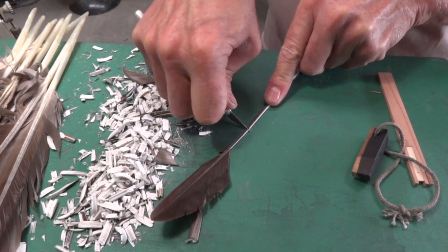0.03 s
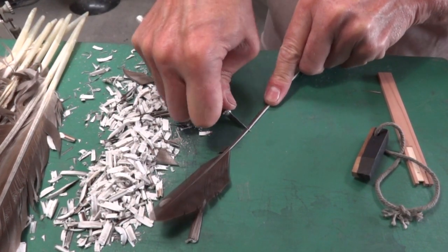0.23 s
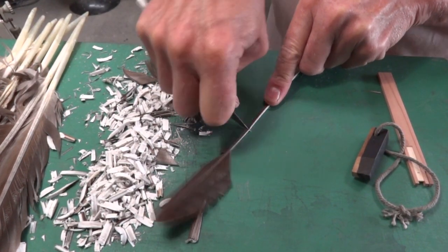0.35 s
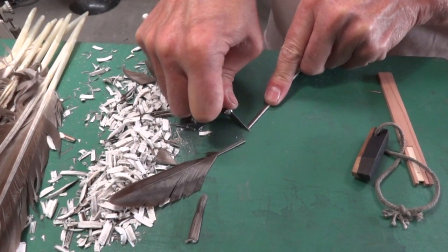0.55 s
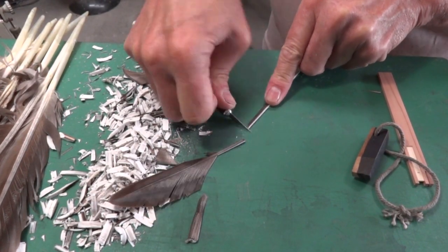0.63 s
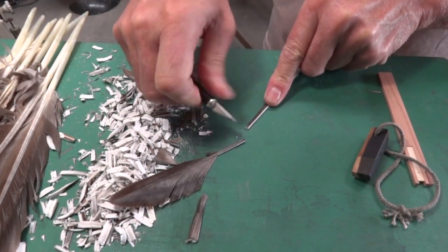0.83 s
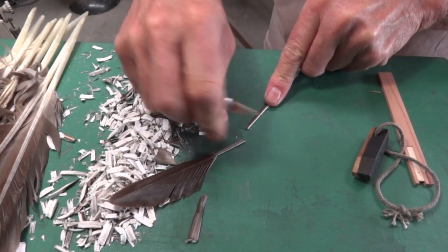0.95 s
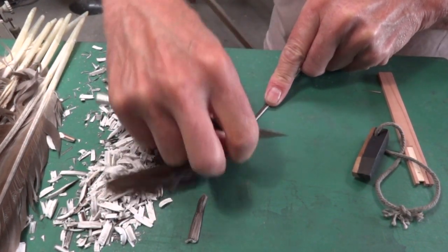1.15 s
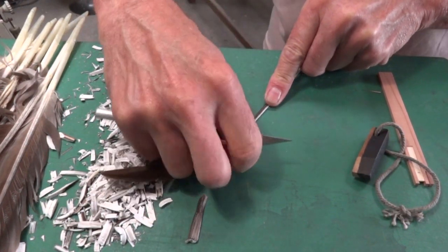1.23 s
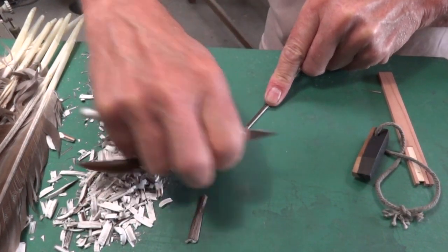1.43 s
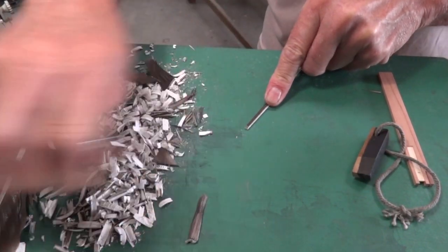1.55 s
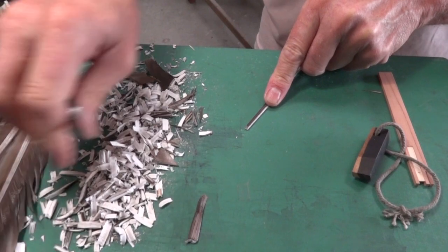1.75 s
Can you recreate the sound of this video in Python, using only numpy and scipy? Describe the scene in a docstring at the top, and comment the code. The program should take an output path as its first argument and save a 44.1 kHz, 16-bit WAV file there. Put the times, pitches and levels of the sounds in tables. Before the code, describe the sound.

A feather quill cracks and snaps under a small blade, followed by faint rustling.

```python
"""On a cutting mat in a quiet room, a small blade is pressed through a feather quill, close by.
The shaft cracks, splits in a quick run of ticks and snaps off; a clack follows as the blade comes free.
Each break makes the quill ring briefly and tears a few fibres, heard as a burst of noise.
Then a hand brushes the feather aside among dry shavings, over a low hum."""
import sys
import numpy as np
from scipy import signal
from scipy.fft import rfft, irfft, next_fast_len
from scipy.io import wavfile
from scipy.ndimage import map_coordinates

SR = 44100
rng = np.random.default_rng(int(sys.argv[2]) if len(sys.argv) > 2 else 0)


def generate_wav(signal):
    """Clip the signal to [-1, 1] and save it as 16-bit WAV at the path in sys.argv[1]."""
    frames = np.transpose(np.atleast_2d(signal))
    scaled = np.clip(frames, -1, 1) * 32767
    pcm = np.round(scaled).astype(np.int16)
    wavfile.write(sys.argv[1], SR, pcm)


N = 79380
TIME = np.arange(N) / SR

# The first cracks. Each row: start in seconds, level in dB.
CRACK_TIMES = [(.2249, -25), (.22529, -24.5), (.2266, -28.5)]
# The shaft's tones. Each row: pitch in Hz, level in dB, seconds to fade by 60 dB (called t60).
SHAFT_TONES = [(330, -16, 0.013), (509, -20.5, 0.013), (1370, -9.5, 0.017), (2510, -13.5, 0.012),
               (3070, -7.5, 0.0079), (4400, -27, .005), (5080, -3.5, 0.012), (10280, -15, .005),
               (12570, 2.5, 0.0046), (13500, -18, .003)]
def crack():
    """The shaft gives way under the blade and rings."""
    return breaks(CRACK_TIMES, SHAFT_TONES, tear_db=-6, tear_t60=0.023, low_cut_hz=150)

# The steps of the split. Each row: start in seconds, level in dB.
SPLIT_TIMES = [(.3396, -25), (.3536, -35), (.3642, -22.5), (.3722, -30.5), (.3753, -28.5)]
# The wall's tones. Each row: pitch in Hz, level in dB, fade time in seconds.
WALL_TONES = [(1400, -16, 0.0063), (2360, -10.5, .009), (4860, -5.5, 0.0084), (5300, -11.5, 0.008),
              (6850, -7.5, 0.00412), (8900, -7.5, .006), (9920, -6.5, 0.0057), (12850, -7, 0.0048)]
def split():
    """A split runs across the quill's wall in quick ticks."""
    return breaks(SPLIT_TIMES, WALL_TONES, tear_db=-11.5, tear_t60=0.0163, low_cut_hz=5000)

# The snap. Each row: start in seconds, level in dB.
SNAP_TIMES = [(.3769, -11)]
# The freed tube's tones. Each row: pitch in Hz, level in dB, fade time in seconds.
TUBE_TONES = [(1300, -60, .008), (3626, -23.5, 0.011), (6420, -16, 0.0051), (7760, 1, 0.0053),
              (9740, -28, 0.0045), (11700, -18, .004), (13240, -15.5, 0.0055)]
def snap():
    """The end snaps off and the freed tube rings."""
    return breaks(SNAP_TIMES, TUBE_TONES, tear_db=-13, tear_t60=0.0099, low_cut_hz=6000)

# The knocks of the clack. Each row: start in seconds, level in dB.
CLACK_TIMES = [(.6552, -31), (.656, -19), (.6573, -38)]
# Tones of blade and quill. Each row: pitch in Hz, level in dB, fade time in seconds.
BLADE_TONES = [(392, -28, 0.026), (1080, -24, 0.0065), (3130, -10.5, 0.012), (3320, -16, 0.013),
               (4440, -12, .007), (5740, -3.5, 0.0085), (6500, -12, 0.0087), (8580, -9, 0.006),
               (10630, -10.5, 0.0059), (12650, -1, .006), (13750, -31, .004)]
def clack():
    """The blade comes free and rings with the quill."""
    return breaks(CLACK_TIMES, BLADE_TONES, tear_db=-9.5, tear_t60=0.026, low_cut_hz=1210)

# The colour of tearing fibres. Each row: frequency in Hz, level in dB.
TEAR_COLOUR = [(200, -28), (700, -13), (1500, -1), (3400, 0.5), (6000, 0), (9000, -8.5), (13500, 4),
               (15000, -16), (16500, -23)]
def breaks(events, tones, tear_db, tear_t60, low_cut_hz):
    """Each sudden release rings the tones and gives a short burst of tearing fibres."""
    out, t = np.zeros(N), TIME[:SR // 10]
    for start, db in events:
        tear = filtered(noise(TEAR_COLOUR, len(t)), lambda f: f / np.hypot(f, low_cut_hz))
        tear *= amp(tear_db - 60 * t / tear_t60)
        add(out, start, amp(db) * (ring(tones, t, pitch_spread=0.015) + tear))
    return out

def ring(tones, t, pitch_spread):
    """Fading tones start together, a little different in level and pitch each time."""
    hz, db, t60 = np.transpose(tones)[:, :, None]
    db_shift, pitch_shift = rng.standard_normal((2, len(tones), 1))
    fade = amp(db + db_shift - 60 * t / t60)
    waves = np.cos(2 * np.pi * hz * (1 + pitch_spread * pitch_shift) * t)
    return np.heaviside(t, .5) * (fade * waves).sum(0)

# The cut end's tones on the mat. Each row: pitch in Hz, level in dB, fade time in seconds.
SKID_TONES = [(1670, -7, 0.0069), (2820, -1.5, 0.0065), (3180, -7.5, 0.0056), (4640, -1, 0.0038),
              (5780, 5, 0.011), (9200, 4, .002), (12400, -2, 0.0022)]
def skid(peak_s=.6853, half_s=0.0026, db=-37.5):
    """The cut end slides briefly on the mat, and the rubbing makes it ring."""
    ringing = ring(SKID_TONES, TIME[:SR // 20], pitch_spread=0.0071)
    rub = signal.fftconvolve(rng.standard_normal(N), ringing)[:N]
    return unit(rub) * amp(db) * swell(peak_s, half_s)

# Small ticks. Each row: start in seconds, level in dB, pitch in Hz, width in octaves.
DRY_TICKS = [(.0695, -45.5, 11300, 0.21), (0.0697, -53, 3460, 0.54), (0.5774, -48, 4900, 0.36),
             (1.2304, -48, 4900, 0.46), (1.458, -56.5, 10970, 0.64), (1.483, -55, 9600, 0.6),
             (1.6242, -46.5, 3500, 0.65), (1.6243, -54.5, 12000, 0.28)]
def ticks(t60=0.011):
    """Tiny touches of blade and shavings, each a quickly fading noise."""
    out, t = np.zeros(N), TIME[:SR // 20]
    for start, db, hz, octaves in DRY_TICKS:
        hiss = band(rng.standard_normal(len(t)), hz, octaves)
        add(out, start, hiss * amp(db - 60 * t / t60))
    return out

# Brushing strokes. Each row: peak time and half length in seconds, level in dB, pitch in Hz,
# width in octaves.
BRUSH_STROKES = [(0.094, 0.052, -73.5, 3960, 0.32), (0.41, 0.024, -63, 14400, .15),
                 (0.83, 0.064, -67, 9100, 1.5), (1.027, 0.012, -63, 2820, 0.45),
                 (1.07, 0.012, -56.5, 3170, 0.63), (1.132, 0.0057, -60, 8400, 1.6),
                 (1.155, 0.0098, -56.5, 5760, 0.67), (1.222, 0.11, -66.5, 5990, 1.7),
                 (1.353, 0.024, -63.5, 6000, 1.02), (1.493, 0.043, -74.5, 6000, 1.4),
                 (1.627, 0.045, -67, 1610, 0.53)]
def brushing(roughness=0.39, grain_s=0.00085):
    """The feather's barbs and the shavings rub in swells of fine, uneven grains."""
    out = np.zeros(N)
    for peak_s, half_s, db, hz, octaves in BRUSH_STROKES:
        flicker = map_coordinates(rng.standard_normal(N), [TIME / grain_s], order=1, mode="wrap")
        grains = rng.standard_normal(N) * np.exp(roughness * flicker)
        out += band(grains, hz, octaves) * amp(db) * swell(peak_s, half_s)
    return out

# The hand's loudness. Each row: time in seconds, level in dB.
HAND_LEVELS = [(0, -65), (.85, -66), (1.1, -61), (1.3, -67.5), (1.48, -69), (1.62, -70.5), (1.8, -63.5)]
# Its colour. Each row: frequency in Hz, level in dB.
HAND_COLOUR = [(30, 1), (80, -6.5), (250, -0.5), (800, -3.5), (2000, -11), (8000, -35)]
def hand():
    """A hand slides over the mat with a soft, low rub."""
    return loudness(HAND_LEVELS) * stereo_noise(HAND_COLOUR)

# Close echoes. Each row: delay in seconds, level in dB before echo_db is added.
NEAR_ECHOES = [(.00378, -13), (.0093, -15.5)]
def echoed(x, echo_db):
    """A sound plus its bounces off hard surfaces close by."""
    return filtered(x, lambda f: 1 + sum(
        amp(db + echo_db) * np.exp(-2j * np.pi * f * delay) for delay, db in NEAR_ECHOES))

# How long the room rings. Each row: frequency in Hz, fade time in seconds.
ROOM_FADE = [(300, 1.5), (3000, 0.62), (8000, 0.56), (14000, .5)]
# The colour of its reflections. Each row: frequency in Hz, level in dB.
ROOM_TONE = [(200, 9), (1500, -2.5), (2300, -2.5), (4000, -3.5), (6500, -6.5), (8000, -6), (9500, -3),
             (12500, -2.5), (16000, -4.5)]
# Their stereo width. Each row: frequency in Hz, width (0 is dead centre).
ROOM_SPREAD = [(1200, 0.28), (4000, 0.31), (12000, 0.21)]
def room(x, tail_db=-12.5, table_db=-11, table_t60=0.12, delay_s=.0035):
    """Quick reflections from the work table, and the room's soft tail."""
    hz, t, spectrum = signal.stft(noise(ROOM_TONE, (2, SR)), SR, nperseg=256)
    fade = amp(-60 * t / along(ROOM_FADE, hz)[:, None])
    tail = signal.istft(spectrum * fade, SR, nperseg=256)[1]
    table = noise(ROOM_TONE, tail.shape) * amp(-60 * TIME[:tail.shape[1]] / table_t60)
    reflections = amp(tail_db) * tail / np.linalg.norm(tail[0])
    reflections += amp(table_db) * table / np.linalg.norm(table[0])
    delayed = np.pad(x, (round(delay_s * SR), 0))
    mid, side = signal.fftconvolve(delayed[None], reflections, axes=1)[:, :N]
    side = filtered(side, lambda f: along(ROOM_SPREAD, f))
    return np.array([mid + side, mid - side])

# The hum's loudness. Each row: time in seconds, level in dB.
HUM_LEVELS = [(0, -74.5), (.35, -67.5), (.46, -62.5), (.65, -87), (.8, -74), (1.13, -55.5), (1.3, -77),
              (1.47, -79), (1.56, -64.5), (1.8, -63)]
def hum(hz=71.8, sharpness=7, octave_db=-10):
    """A low, wavering hum with a quieter tone an octave up."""
    low = resonant(rng.standard_normal(N), hz, sharpness)
    octave = resonant(rng.standard_normal(N), 2 * hz, 2 * sharpness)
    return loudness(HUM_LEVELS) * (low + amp(octave_db) * octave)

# The colour of the room's air. Each row: frequency in Hz, level in dB.
AIR_COLOUR = [(12, -37), (20, -7), (59, 0), (207, -4), (534, -15), (705, -13), (1540, -21), (1720, -20),
              (3260, -24), (4680, -26), (13100, -33), (15500, -36)]
def air(db=-58.5, dull_hz=11000):
    """The faint, steady rush of room air, with softened treble."""
    return amp(db) * filtered(stereo_noise(AIR_COLOUR), lambda hz: 1 / np.hypot(1, hz / dull_hz))

# How alike left and right are. Each row: frequency in Hz, likeness from 0 to 1.
EAR_LIKENESS = [(40, 0.98), (140, 0.99), (350, 0.73), (700, 0.38), (1500, 0.46), (4000, 0.55), (12000, 1)]
def stereo_noise(colour):
    """Noise that is centred in the bass and high treble, and wider in between."""
    def shares(hz):
        angle = np.arccos(along(EAR_LIKENESS, hz)) / 2
        return np.array([np.cos(angle), np.sin(angle)])
    mid, side = filtered(noise(colour, (2, N)), shares)
    return unit(np.array([mid + side, mid - side]))

def amp(db):
    """Turn decibels into a multiplier."""
    return 10 ** (np.asarray(db) / 20)

def unit(x):
    """Scale a sound to an average strength (rms) of 1."""
    return x / np.sqrt(np.mean(x ** 2) + 1e-20)

def swell(peak_s, half_s):
    """A bell-shaped rise and fall."""
    return np.exp(-.5 * ((TIME - peak_s) / half_s) ** 2)

def loudness(rows):
    """A multiplier that glides through (seconds, dB) rows."""
    return amp(np.interp(TIME, *np.transpose(rows)))

def along(rows, hz):
    """Read between (Hz, value) rows on a musical pitch scale."""
    f, values = np.transpose(rows)
    return np.interp(np.log(hz + 1), np.log(f + 1), values)

def filtered(x, response):
    """Turn each frequency up or down as response says."""
    n = x.shape[-1]
    size = next_fast_len(n + 8192)
    return irfft(rfft(x, size) * response(np.fft.rfftfreq(size, 1 / SR)), size)[..., :n]

def noise(colour, shape):
    """Noise with a given colour: its balance of lows and highs."""
    return unit(filtered(rng.standard_normal(shape), lambda hz: amp(along(colour, hz))))

def band(x, hz, octaves):
    """Keep a bell-shaped band around hz, at strength 1."""
    return unit(filtered(x, lambda f: np.exp(-.5 * (np.log2((f + 1) / hz) / octaves) ** 2)))

def resonant(x, hz, q):
    """Make a sound ring near hz; a higher q gives a purer tone."""
    return unit(filtered(x, lambda f: 1j * f * hz / q / (hz * hz - f * f + 1j * f * hz / q)))

def add(track, start, sound):
    """Mix a sound in at start seconds."""
    i = max(0, round(start * SR))
    track[i:i + len(sound)] += sound[:len(track) - i]

def scene():
    """The work sits in the centre; each stage echoes a little differently as the hands move."""
    cracking = crack()
    parting = split() + snap()
    release = clack() + skid()
    rustle = ticks() + brushing()
    close = echoed(cracking, echo_db=-4) + echoed(parting, echo_db=3) + echoed(release, echo_db=-22)
    reflections = sum(room(stage) for stage in (cracking, parting, release, rustle))
    return close + rustle + reflections + hand() + hum() + air()

def record(dry, top_hz=16150):
    """Cut away the very highest treble."""
    return filtered(dry, lambda hz: 1 / np.sqrt(1 + (hz / top_hz) ** 160))

dry = scene()
out = record(dry)
generate_wav(out)
```